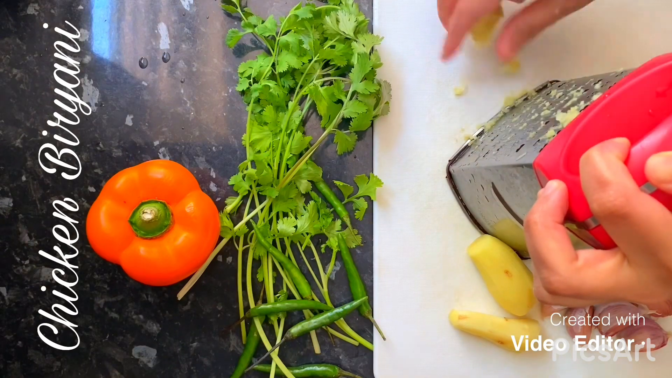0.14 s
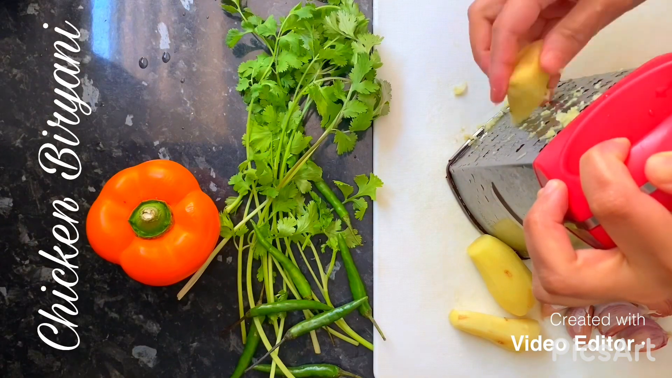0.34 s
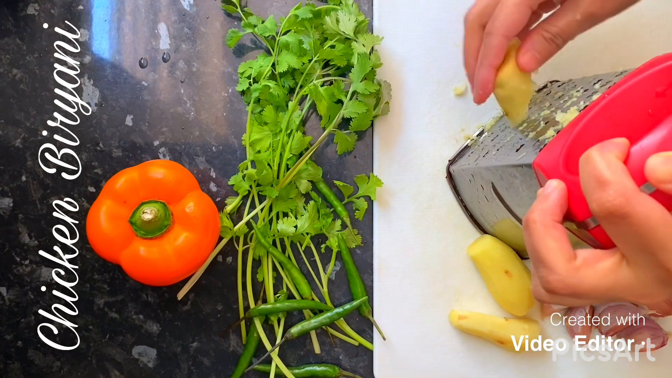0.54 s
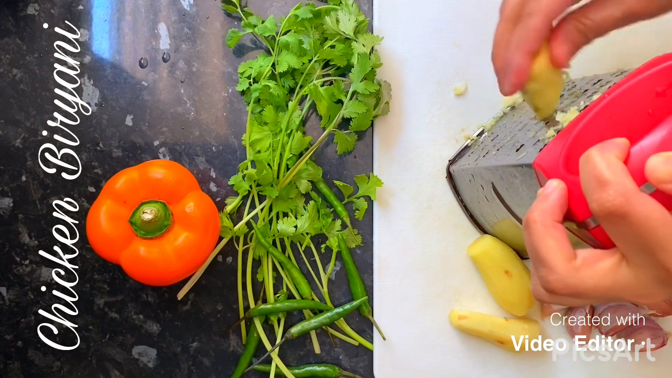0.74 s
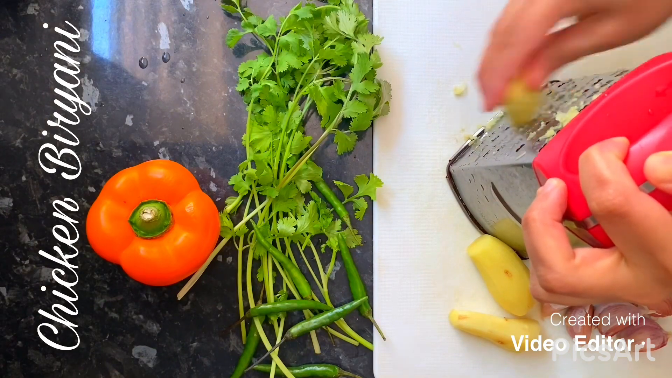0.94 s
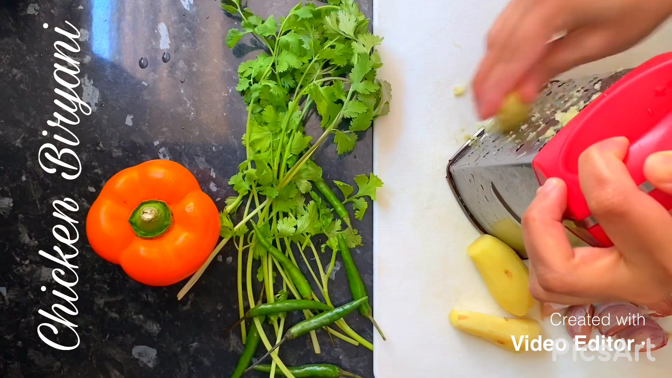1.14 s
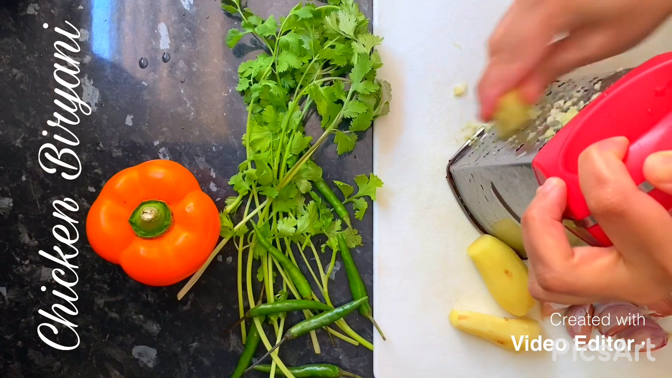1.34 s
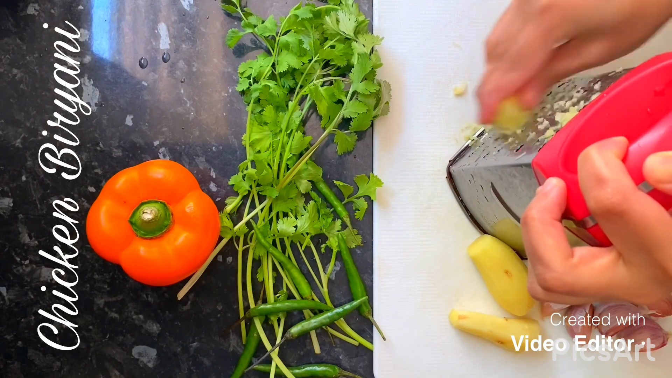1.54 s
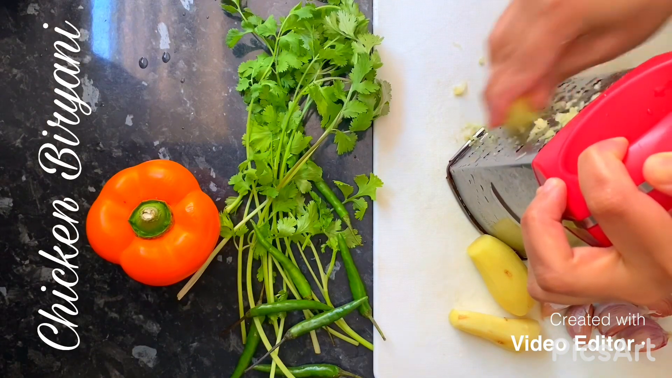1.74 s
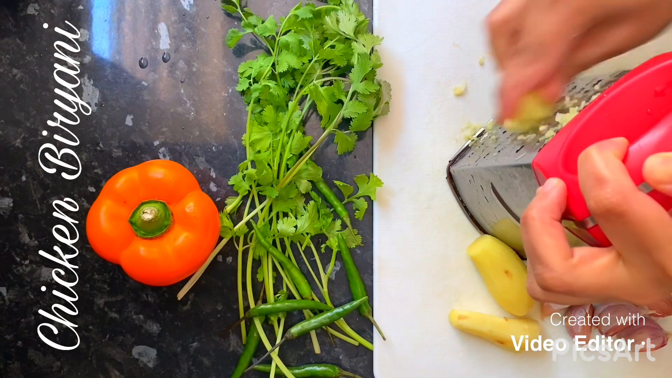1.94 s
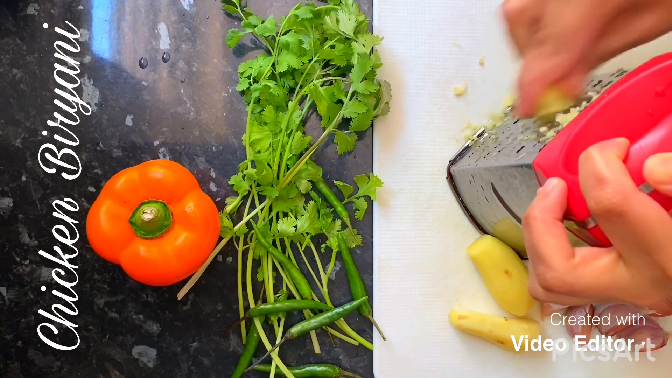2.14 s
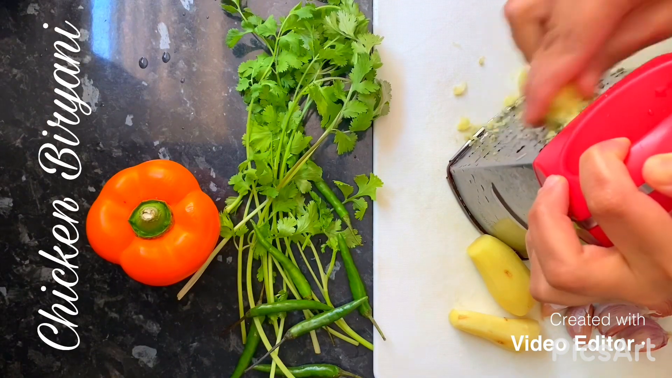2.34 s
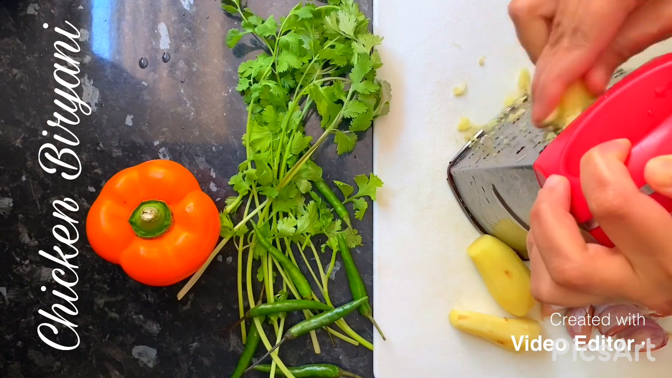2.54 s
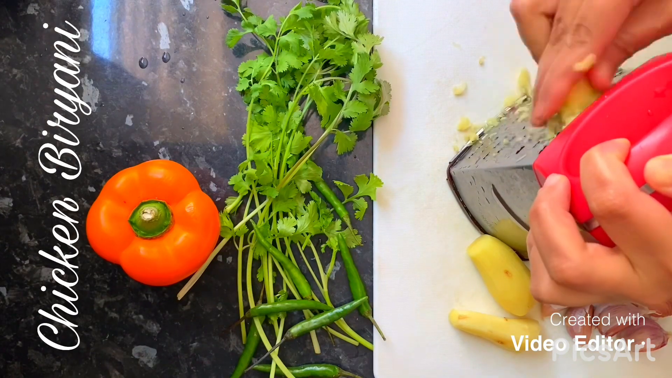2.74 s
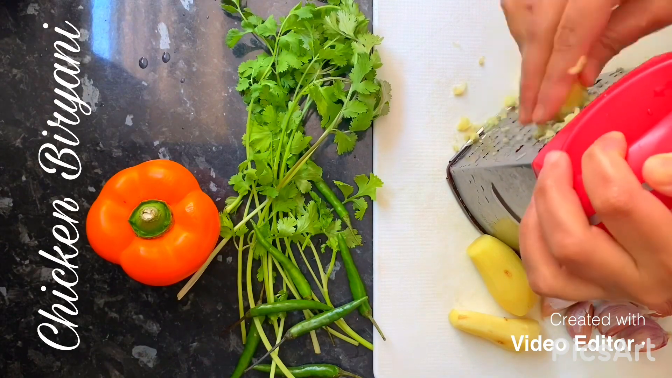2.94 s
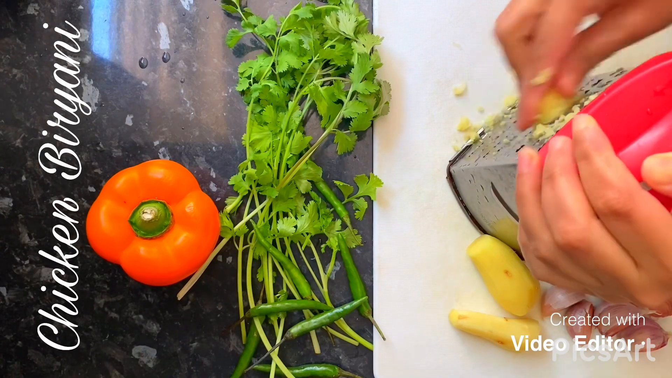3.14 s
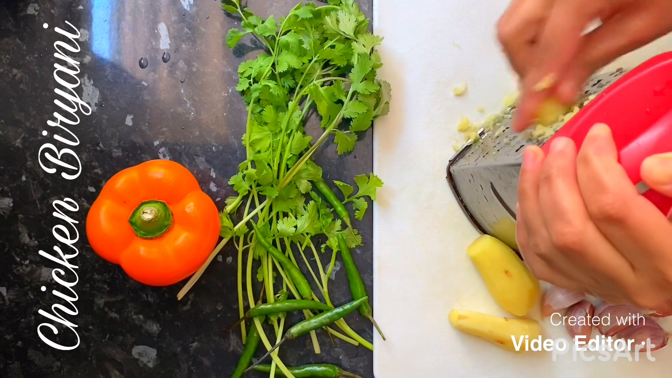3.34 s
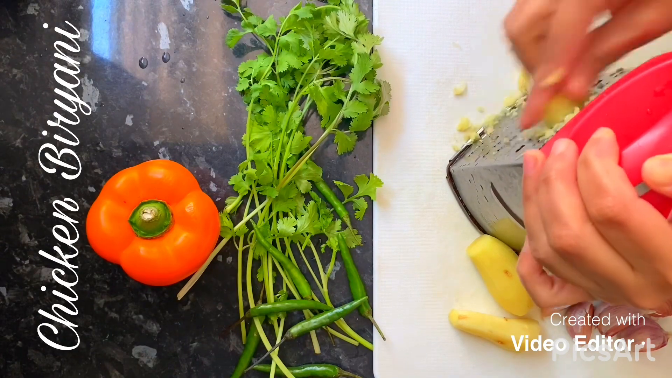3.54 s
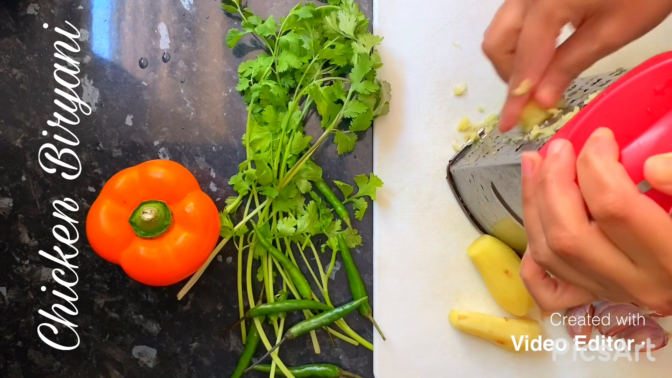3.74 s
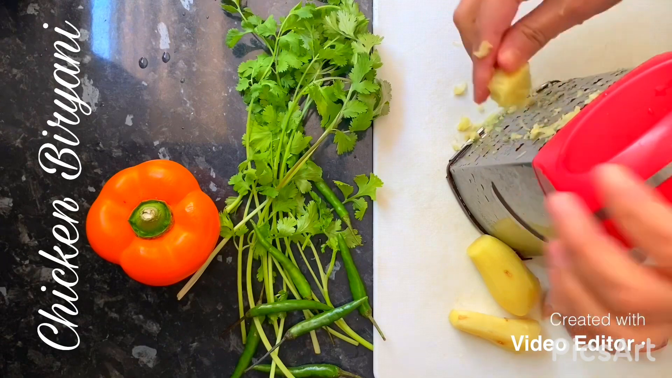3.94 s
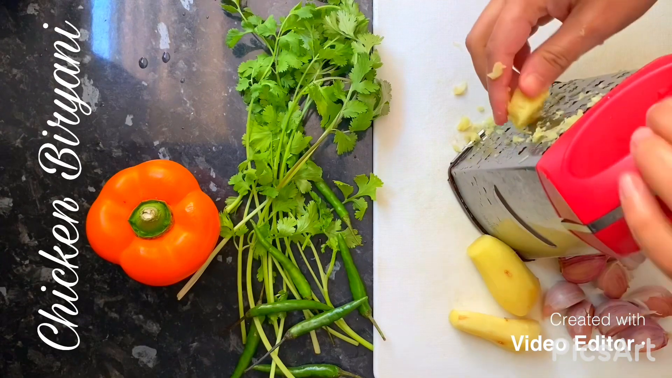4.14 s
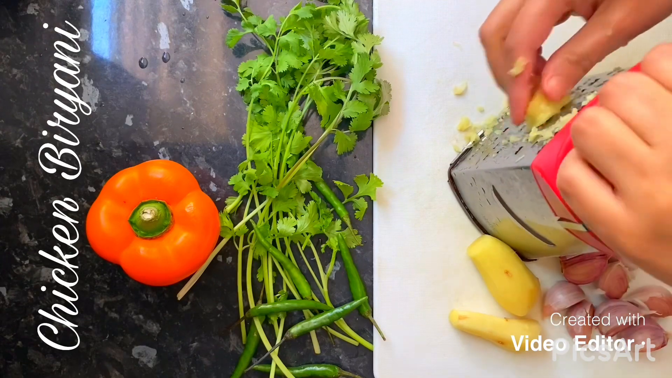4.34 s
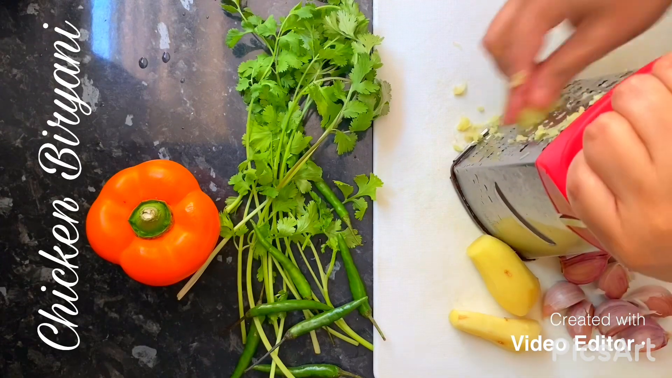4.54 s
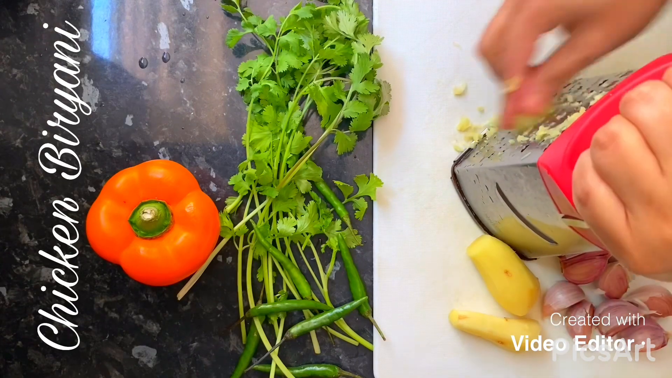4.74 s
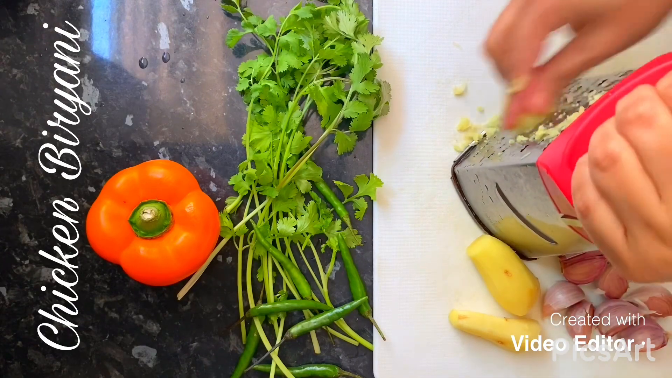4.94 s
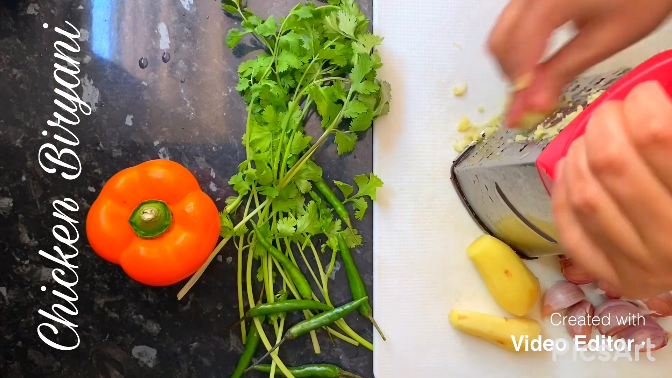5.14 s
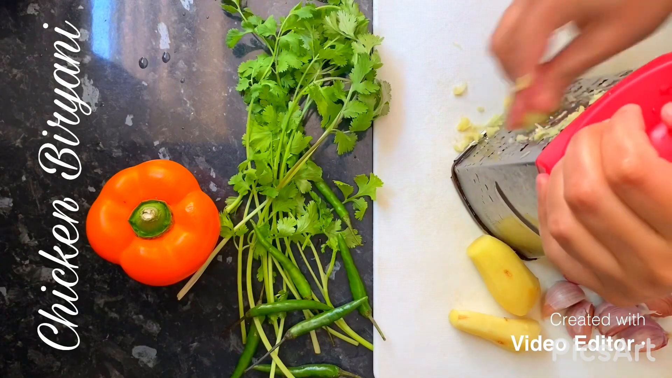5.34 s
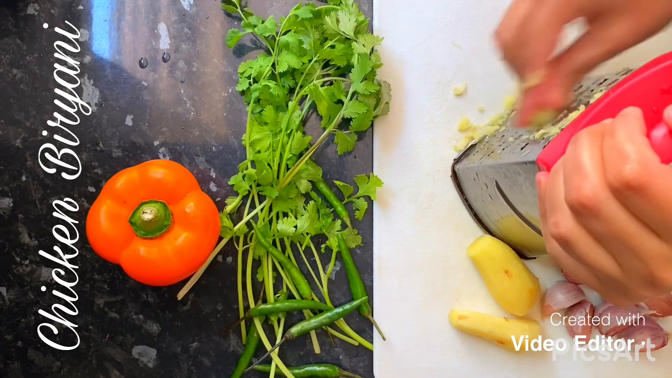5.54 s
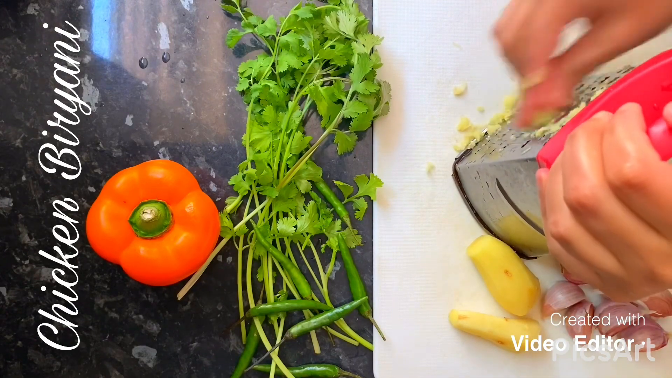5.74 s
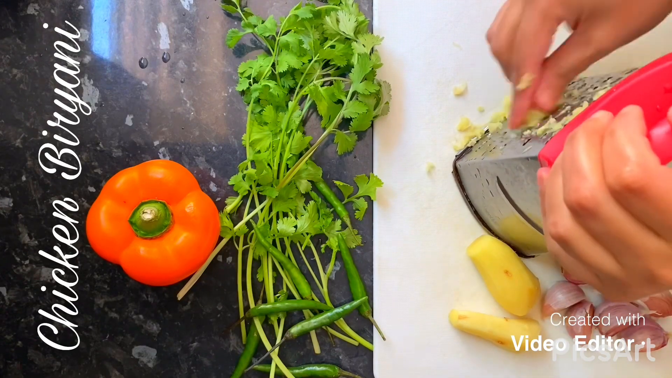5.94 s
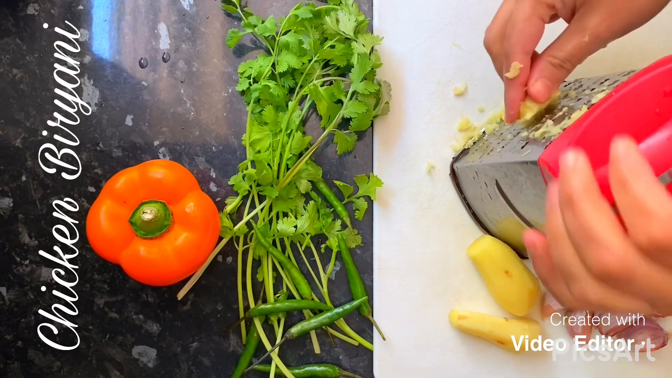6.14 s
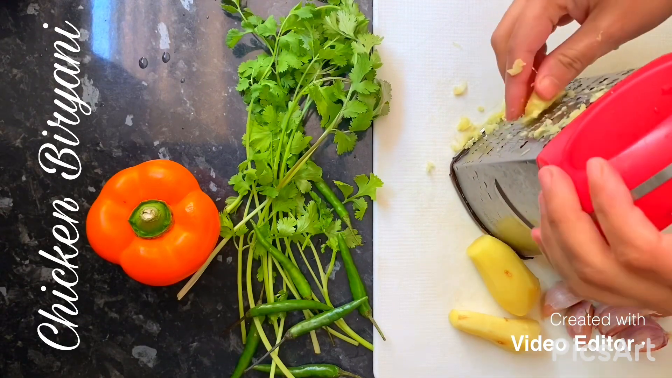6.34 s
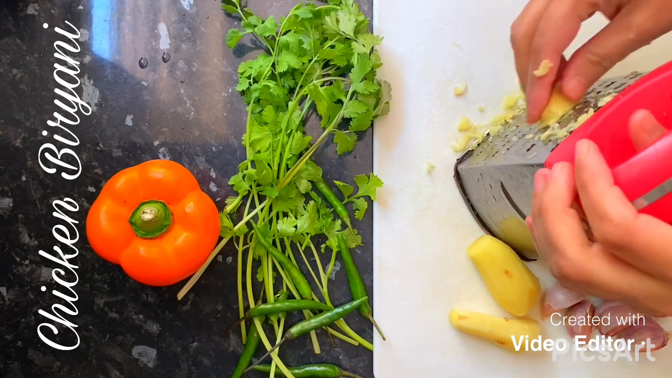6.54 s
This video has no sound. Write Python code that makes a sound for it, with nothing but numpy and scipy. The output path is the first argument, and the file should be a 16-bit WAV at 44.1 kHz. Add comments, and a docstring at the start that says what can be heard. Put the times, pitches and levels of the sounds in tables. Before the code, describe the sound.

Fresh ginger rasps quickly back and forth on a hollow steel grater, wet and crackling, with a short pause midway and a soft tap near the end.

```python
"""Ginger is rubbed on a steel box grater on a cutting board, in a small kitchen with a faint, steady hush.
The rim knocks on the board and light touches brush the steel; then strokes to and fro run ten a second,
rest briefly at 3.7 s and go on in a new hold. Teeth tear fibres in a dense crackle that rings the box,
juice crackles in the treble, tough fibres snap and the rocking grater makes the worktop rumble.
Touches and a soft ringing tap on the rim end it; a phone close above hears all with two microphone ports."""
import sys
import numpy as np
from scipy import signal
from scipy.fft import rfft, irfft, next_fast_len
from scipy.io import wavfile
from scipy.ndimage import uniform_filter1d

SR = 44100
rng = np.random.default_rng(int(sys.argv[2]) if len(sys.argv) > 2 else 0)


def materialize(psi):
    """Save the field psi as 16-bit PCM at rate SR to the path in sys.argv[1].

    A 1-D psi becomes a single channel; in a 2-D psi each row is a channel.
    """
    bounded = np.clip(np.atleast_2d(psi).T, -1, 1)
    quanta = np.round(bounded * 32767).astype(np.int16)
    wavfile.write(sys.argv[1], SR, quanta)


N = 290619
T = np.arange(N) / SR
SIZE = next_fast_len(N + SR)
HZ = np.fft.rfftfreq(SIZE, 1 / SR)

# strokes to and fro across the teeth; levels are relative, before grip and filters:
# start_s, rasp_db, juice_db, peak_place (fastest moment as a share of the stroke, held to .38-.62),
# low_lift_db (box's low modes), shake_db (worktop)
STROKES = [(0.713, -44.5, -53, 0.44, 3.5, -44.5), (0.84, -46, -53.5, 0.48, 2, -44.5),
           (0.957, -43, -51, 0.37, 3.5, -40.5), (1.061, -40.5, -48.5, 0.33, 3.5, -41),
           (1.165, -40.5, -49, 0.14, 5.5, -38), (1.268, -40, -48, 0.7, -2.5, -43),
           (1.36, -38, -47.5, 0.1, 2.5, -35), (1.459, -38, -47.5, 0.4, 1.5, -43),
           (1.554, -40.5, -47.5, 0.4, -3.5, -35), (1.648, -40, -47.5, 0.41, 1.5, -40),
           (1.749, -37.5, -45, .46, 1.5, -40), (1.845, -39, -44.5, 0.5, 3.5, -42),
           (1.942, -38, -45.5, 0.42, 4, -38), (2.037, -39.5, -46.5, 0.4, -1.5, -34.5),
           (2.13, -38, -46, 0.37, 0.5, -39), (2.222, -37.5, -44, 0.44, 2, -35.5),
           (2.311, -36.5, -45, 0.47, 3, -33.5), (2.405, -37.5, -44.5, 0.43, 0, -33),
           (2.504, -37.5, -45, 0.53, -1.5, -32.5), (2.6, -37.5, -44.5, 0.49, 3, -36),
           (2.701, -37, -45.5, 0.45, 3, -35), (2.799, -41, -48.5, 0.3, 0.5, -36),
           (2.905, -40, -48.5, .45, 4, -36.5), (3.005, -40.5, -48, .52, 1.5, -44),
           (3.118, -38.5, -45, 0.42, 3.5, -39), (3.221, -41.5, -48, 0.42, -3, -35),
           (3.32, -37.5, -46, 0.48, 1, -38.5), (3.412, -36.5, -45, 0.55, 0, -30.5),
           (3.515, -37, -45, 0.45, -0.5, -33), (3.621, -39.5, -49, 0.22, -1, -38.5),
           (4.34, -39.5, -50.5, 0.5, 3, -34), (4.448, -37.5, -46, 0.25, 0, -37),
           (4.552, -38, -47.5, 0.55, -0.5, -36), (4.647, -37, -46, .5, -2.5, -28.5),
           (4.747, -35.5, -47, 0.49, 1, -32.5), (4.848, -37.5, -46.5, 0.51, -2.5, -34),
           (4.948, -38, -45.5, 0.46, 0, -32), (5.05, -38, -46.5, 0.36, 0.5, -34.5),
           (5.154, -34.5, -44, .54, -1, -34), (5.248, -36, -46, 0.6, 0.5, -35.5),
           (5.348, -37.5, -45.5, 0.34, 0, -33.5), (5.442, -37.5, -46, 0.48, 3.5, -32),
           (5.537, -37, -44.5, 0.39, 2, -35), (5.639, -37, -46, 0.37, 1, -29),
           (5.74, -36.5, -45, 0.3, -2.5, -33.5), (5.839, -43, -53, 0.3, -7, -39)]
# tough fibres that snag on a tooth and snap: start_s, level_db (relative), crunch_hz (centre)
SNAGS = [(0.589, -33.5, 1940), (0.617, -26.5, 2430), (0.718, -28, 1940), (0.854, -25.5, 1420),
         (0.886, -23.5, 1620), (0.976, -28, 2220), (1.096, -28, 1230), (1.191, -18.5, 2430),
         (1.377, -25, 902), (1.492, -31, 1570), (1.515, -17, 1260), (1.681, -22, 1630),
         (1.772, -14.5, 1930), (1.787, -15.5, 663), (1.892, -25, 1970), (1.954, -25, 1390),
         (2.083, -23, 1940), (2.154, -20.5, 1240), (2.239, -23, 1570), (2.262, -16.5, 1850),
         (2.331, -21.5, 1340), (2.452, -18, 1580), (2.524, -19.5, 1340), (2.647, -15, 2090),
         (2.665, -17.5, 1570), (2.722, -23, 1210), (2.825, -21, 1570), (2.928, -18.5, 1250),
         (3.144, -21.5, 1580), (3.339, -20, 2060), (3.445, -28, 1280), (3.658, -22, 1280),
         (4.389, -15.5, 1620), (4.482, -14, 2340), (4.508, -20, 1540), (4.686, -13.5, 2600),
         (5.076, -16.5, 1260), (5.18, -22, 1330), (5.208, -18.5, 1600), (5.281, -22, 1560),
         (5.327, -23, 1570), (5.37, -28, 2470), (5.47, -15, 1340), (5.561, -20.5, 1550), (5.67, -21, 2440),
         (5.773, -21, 1580)]
# the grater tips and bumps the board: start_s, thud_db, shake_db (shaking that follows), both relative
BUMPS = [(1.445, -14.5, -24), (1.811, -48, -27.5), (2.192, -38, -35), (2.745, -40, -36),
         (2.994, -19.5, -26.5), (3.603, -38, -25), (4.25, -38, -43), (4.431, -21, -26.5), (5.249, -49, -32),
         (5.69, -44, -46), (6.191, -39, -41), (6.43, -70, -43)]


def undb(db):
    """Decibels to gain."""
    return 10 ** (np.asarray(db) / 20)


def unit(response):
    """Scale a frequency response so white noise keeps its power."""
    return response / np.sqrt(np.mean(np.abs(response) ** 2))


def through(x, response):
    """Filter by a frequency response."""
    return irfft(rfft(x, SIZE) * response, SIZE)[..., :N]


def colour(points):
    """Causal response with the given (Hz, dB) outline, scaled so white noise keeps its power."""
    hz, db = np.transpose(points)
    outline_db = np.interp(np.log(HZ + 1), np.log(hz), db)
    # folding the cepstrum forward in time gives minimum phase
    cepstrum = irfft(np.log(undb(outline_db)), SIZE)
    cepstrum[1:SIZE // 2] *= 2
    cepstrum[SIZE // 2 + 1:] = 0
    return unit(np.exp(rfft(cepstrum)))


def mode(hz, width, freqs=HZ):
    """Response of one resonance, gain 1 at its centre."""
    return 1j * freqs * width / (hz ** 2 - freqs ** 2 + 1j * freqs * width)


def walk(rate):
    """Chance level joined by straight lines between `rate` random points a second, spread a little under 1."""
    return np.interp(T * rate, np.arange(N), rng.standard_normal(N))


def crackle(rate, spread_db):
    """Lone clicks of uneven size and either sign, about `rate` a second, scaled to rms 1."""
    size_chance, time_chance, sign_chance = rng.random((3, N))
    size = undb(spread_db * np.minimum(-np.log(1 - size_chance), 4))
    clicks = (time_chance < rate / SR) * size * np.sign(sign_chance - .5)
    return clicks / clicks.std()


def fade(start, fade_s, rise_s):
    """A quick rise that dies away."""
    live = slice(int(start * SR), int((start + 10 * fade_s) * SR))
    age = np.maximum(T[live] - start, 0)
    shape = np.zeros(N)
    shape[live] = (1 - np.exp(-age / rise_s)) * np.exp(-age / fade_s)
    return shape


def steady(x):
    """Even out the swell of a ringing, as the hand's constant drive does; rms near 1."""
    return x / np.sqrt(uniform_filter1d(x ** 2, size=2000) + 1e-9)


def hush():
    """Faint steady air of the kitchen, alike at both ports in the bass, with a narrow noise band near 3.3 kHz."""
    # spectrum of the room air: freq_hz, level_db (per Hz)
    air_outline = [(20, 0), (36, -5), (55, -7.5), (105, 0), (170, -6), (250, -13), (550, -15.5),
                   (950, -20.5), (1100, -26), (2700, -35.5), (3250, -38), (3650, -44.5), (6500, -69),
                   (10000, -42), (16000, -67)]
    mid, side = through(rng.standard_normal((2, N)), colour(air_outline))
    difference = through(side, HZ / (HZ + 900))
    air = mid + np.array([[1], [-1]]) * difference
    narrow_band = through(rng.standard_normal((2, N)), unit(mode(3320, 130) ** 2))
    return undb(-57.5) * air + undb(-85) * narrow_band


def strokes():
    """Rows of the stroke table with their length added: each lasts to the next turn, or until the hand stops."""
    usual_s = .1
    gaps = np.diff([row[0] for row in STROKES], append=np.inf)
    return np.column_stack([STROKES, np.where(gaps < 2 * usual_s, gaps, usual_s)])


def shaking():
    """Strength of the worktop's shaking: strokes drive it, it runs on a little and swells after each bump."""
    build_s, run_on_s, resting_db = .06, .14, -62  # it never quite ends
    drive = np.zeros(N)
    for start, *others, shake_db, length in strokes():
        drive += undb(shake_db) * ((T >= start) & (T < start + length))
    build = uniform_filter1d(drive, int(build_s * SR))
    keep = np.exp(-1 / (run_on_s * SR))
    run_on = signal.lfilter([1 - keep], [1, -keep], drive)
    swells = sum(undb(shake_db) * fade(start, fade_s=.045, rise_s=.006) for start, thud_db, shake_db in BUMPS)
    return undb(resting_db) + undb(-2) * build + undb(-12) * run_on + swells


def thuds():
    """Each bump of the grater is a short burst of noise, strongest in the bass."""
    blows = sum(undb(thud_db) * fade(start, fade_s=.0071, rise_s=.01) for start, thud_db, shake_db in BUMPS)
    board = colour([(30, -8), (65, 18.5), (100, 14), (150, 6.5), (260, 7), (400, -45), (1200, -44), (8000, -78)])
    return through(blows * rng.standard_normal(N), board)


def worktop(rocking):
    """The rocking grater keeps the worktop's modes shaking and now and then bumps it."""
    # modes of board and worktop: centre_hz, width_hz, level_db (relative)
    wood_modes = [(53.1, 26, -5.5), (73.7, 25, -2.5), (95.8, 2.4, -0.5), (146, 18, -7), (187.1, 26.3, -5),
                  (230.2, 10, -8.5), (257.7, 1.9, -15.5)]
    outline = colour([(25, -23.5), (45, 6.5), (280, -9.5), (400, -14), (900, -10)])
    body = unit(sum(undb(db) * mode(hz, width) for hz, width, db in wood_modes) * outline)
    rumble = steady(through(rng.standard_normal(N), body))
    shake = (undb(-5.5) * rocking + undb(-4) * rumble) * shaking()
    return shake + undb(3) * thuds()


def handling():
    """Fingers shift on the root and the handle: a faint, patchy rustle."""
    patchy = undb(4 * np.minimum(walk(14), 1.5))
    return undb(-78) * patchy * crackle(rate=500, spread_db=3)


def box(push, size=16384):
    """The steel rings; each stroke loads it at a new place, which detunes the modes and shifts their balance."""
    # modes of the steel box, levels relative:
    # centre_hz, width_hz, first_hold_db, second_hold_db, left_minus_right_db
    steel_modes = [(433, 21.5, -2, -1.5, -4), (608.3, 19, 3.5, 3, -3), (652.6, 26, -3, 2, 13),
                   (726, 118, -2.5, 0.5, -6), (881, 83, -5.5, -11.5, 3.5), (1017, 23, -13, -9.5, 14.5),
                   (1250, 60, -2, -1, 9.5), (1327, 92, -2, -1, -9), (1565, 34.4, 3.5, 4, 10),
                   (1727, 150, -9, -11.5, -13.5), (1950, 360, -14, -14.5, -14), (1972, 105, 1.5, -2.5, 5),
                   (2284, 164, -9, -7, -5), (2417, 88, -4.5, 0, -0.5), (2736, 58, -12, -12.5, 19.5),
                   (2978, 183, -10, -10.5, -10), (3115, 78, -7, -9, 8), (3725, 65, -4, -5.5, -1),
                   (4300, 58, -13, -10, 13.5)]
    # share of a stroke's low lift that a mode gets: freq_hz, share (0-1)
    low_share = [(900, 1), (1200, 0)]
    regrip_s = 4.0  # the hand on the grater moves to its second hold
    detune_share, scatter_db = .02, 2.8  # typical straying of each mode
    freqs = np.fft.rfftfreq(size, 1 / SR)
    hz, width, first_db, second_db, pan = np.transpose(steel_modes)
    outline = colour([(200, -2.5), (350, -8.5), (450, 0), (4500, -1), (9000, -14.5)])
    radiation = np.interp(freqs, HZ, outline)
    turns = [int(row[0] * SR) for row in STROKES] + [N]
    # the loading changes at each turn, and every half block while the hand rests
    cuts = {N}
    for a, b in zip([0] + turns, turns):
        cuts.update(range(a, b, size // 2))
    cuts = sorted(cuts)
    out = np.zeros((2, N + size))
    for a, b in zip(cuts, cuts[1:]):
        detune, favour = rng.standard_normal((2, len(steel_modes)))
        hold_db = first_db if a < regrip_s * SR else second_db
        lift_db = np.interp(a, turns[:-1], [row[4] for row in STROKES])
        db = hold_db + scatter_db * favour + lift_db * np.interp(hz, *np.transpose(low_share))
        shapes = mode(hz[:, None] * (1 + detune_share * detune[:, None]), width[:, None], freqs)
        response = unit(undb(db + np.array([pan, -pan]) / 2) @ shapes * radiation)
        out[:, a:a + size] += irfft(rfft(push[a:b], size) * response, size)
    return out[:, :N]


def rim_knocks():
    """The rim of the grater knocks on the board: short noise bursts in a broad band."""
    # start_s, fade_s, level_db (relative), centre_hz
    knock_table = [(0.049, 0.013, -47, 517), (0.075, 0.011, -50, 503)]
    out = np.zeros(N)
    for start, fade_s, db, hz in knock_table:
        burst = undb(db) * fade(start, fade_s, rise_s=.00064) * rng.standard_normal(N)
        out += through(burst, unit(mode(hz, .57 * hz) ** 2))
    return out


def arch(start, length, peak, power):
    """Speed of the root in one stroke, scaled to rms 1: fastest at its peak, it nearly stops at each turn."""
    turn_speed = .24  # added to a swing from 0 to 1
    peak = np.clip(peak, .38, .62)
    u = np.interp(np.linspace(0, 1, int(length * SR)), [0, peak, 1], [0, .5, 1])
    speed = turn_speed + np.abs(np.sin(np.pi * u)) ** power
    return np.pad(speed / np.sqrt(np.mean(speed ** 2)), (int(start * SR), N))[:N]


def contact(rocking):
    """How hard fibres are torn and juice is pressed out at each moment."""
    # light touches of root and fingers on the steel, levels relative: start_s, rise_s, fade_s, rasp_db, juice_db
    touch_table = [(.26, .003, 0.024, -54, -61), (0.28, 0.0033, 0.01, -55, -70),
                   (0.587, 0.0035, 0.019, -46, -51.5), (0.61, 0.006, 0.035, -47.5, -51),
                   (0.664, 0.0095, 0.014, -46, -48), (3.725, 0.0015, 0.052, -53.5, -60),
                   (3.972, .003, 0.013, -59, -72), (4.235, .06, 0.056, -59, -68),
                   (4.322, 0.033, .03, -49, -75), (5.937, 0.0018, 0.048, -53.5, -61),
                   (5.987, 0.0024, 0.03, -57.5, -80), (6.146, 0.011, .02, -55, -70),
                   (6.173, 0.0016, 0.018, -42.5, -57.5), (6.425, 0.05, 0.052, -52, -75),
                   (6.455, 0.032, 0.042, -62, -62), (6.534, .008, 0.014, -50, -67),
                   (6.578, .01, 0.022, -49, -51)]
    tear, wet = np.zeros((2, N))
    for start, rasp_db, juice_db, peak, low_db, shake_db, length in strokes():
        tear += undb(rasp_db) * arch(start, length, peak, power=1.3)
        wet += undb(juice_db) * arch(start, length, peak, power=1.18)
    # the soft root gives, which rounds each turn
    tear, wet = uniform_filter1d(np.array([tear, wet]), size=400)
    # it catches and slips along the rows of teeth, and bites deeper as the grater rocks towards it
    grip_db = 1.4 * walk(210) + .6 * rocking
    for start, level_db, hz in SNAGS:
        # it hangs for 10 ms before a tough fibre gives way, so the rasp dips 5 dB
        grip_db = grip_db - 5 * ((T > start - .01) & (T < start))
    tear = tear * undb(grip_db + .31)
    wet = wet * undb(.5 * grip_db + 2 * walk(120) + .5)
    patchy = undb(2.5 * walk(150))
    for start, rise_s, fade_s, rasp_db, juice_db in touch_table:
        touch = fade(start, fade_s, rise_s) * patchy
        tear = tear + undb(rasp_db) * touch
        wet = wet + undb(juice_db) * touch
    return tear, wet


def snapping():
    """Each tough fibre breaks in a short burst of cracks with a pitch of its own."""
    fade_s, rise_s = .006, .0006
    out = np.zeros(N + SR)
    age = np.arange(int(10 * fade_s * SR)) / SR
    shape = (1 - np.exp(-age / rise_s)) * np.exp(-age / fade_s)
    for start, db, hz in SNAGS:
        cracks = undb(db) * shape * rng.standard_normal(len(age))
        crunch = signal.lfilter(*signal.iirpeak(hz, 2.5, fs=SR), cracks)
        out[int(start * SR):][:len(age)] += undb(-6) * cracks + undb(3.5) * crunch
    return out[:N]


def grater(tear, wet):
    """Breaking fibres ring the box and are heard directly; bursting cells crackle in the treble."""
    # spectra of torn fibre and of spurting juice: freq_hz, level_db (per Hz)
    fibre_outline = [(100, -27.5), (300, -3), (700, -4), (2500, -19), (4000, -6.5), (6000, -14.5),
                     (16000, -17.5)]
    juice_outline = [(500, -30), (2500, -10), (4000, -4), (5300, -3), (7800, 1.5), (11000, -2), (15000, 0)]
    snaps = snapping()
    breaks = tear * crackle(rate=1200, spread_db=1.5) + undb(-11) * snaps + handling()
    cells = wet * crackle(rate=6000, spread_db=1) + undb(-17.5) * snaps
    steel = undb(-2.5) * box(breaks)
    torn = undb(-13.5) * through(breaks, colour(fibre_outline))
    juice = undb(1.5) * through(cells, colour(juice_outline))
    return steel + torn + rim_knocks() + juice


def rim():
    """A soft tap on the free rim and its bounce leave a few thin, short rings."""
    # modes of the free rim: centre_hz, width_hz, level_db (relative)
    rim_modes = [(1370, 63, -3), (1420, 60, -7), (1780, 58, 0), (1920, 37, 5), (2681, 30, 6.5),
                 (2820, 110, -18), (3310, 12, -13), (3940, 30, -14), (4920, 16, -5), (5600, 13, -17)]
    # the tap and its bounce: start_s, level_db (relative)
    tap_table = [(6.1704, -9), (6.1762, -17)]
    contact_s = .00017  # time scale of the bell-shaped press
    push = sum(undb(db) * np.exp(-((T - start) / contact_s) ** 2) for start, db in tap_table)
    push = push / (np.sqrt(np.pi) * contact_s * SR)
    return through(push, unit(sum(undb(db) * mode(hz, width) for hz, width, db in rim_modes)))


def reflections(x, t60_s, treble_t60_s, delay_s):
    """A dense echo tail, different at each port, whose treble dies first."""
    tails = rng.standard_normal((2, N))
    low = through(tails, 1 / (1 + (HZ / 3500) ** 2))
    low_tail = low * undb(-60 * T / t60_s)
    treble_tail = (tails - low) * undb(-60 * T / treble_t60_s)
    tail = (low_tail + treble_tail) * (T > delay_s)
    tail = tail / np.sqrt(np.sum(tail ** 2, axis=1, keepdims=True))
    return through(x, rfft(tail, SIZE))


def scene():
    """Grater at close range, its echoes from the worktop and the walls, rumble and room air."""
    # phase by which the right microphone port lags: freq_hz, lag_rad
    port_lag = [(0, 0), (2000, 0), (2600, 1.3), (3500, 1.2), (5200, .2), (7200, 3.1), (10300, 6.3),
                (13600, 9.4), (16000, 12.5)]
    # the grater's slow rocking on the board: a narrow band around 46 Hz
    rocking = steady(through(rng.standard_normal(N), unit(mode(hz=46, width=4.5) ** 2)))
    rasp = grater(*contact(rocking)) + rim()
    lag = np.interp(HZ, *np.transpose(port_lag))
    direct = through(rasp, np.exp(-1j * np.outer([0, 1], lag)))
    near = undb(-9) * reflections(rasp, t60_s=.05, treble_t60_s=.04, delay_s=.001)
    walls = undb(-13) * reflections(rasp, t60_s=.42, treble_t60_s=.38, delay_s=.007)
    return undb(2) * direct + near + walls + worktop(rocking) + hush()


def record(dry):
    """The phone cuts the deepest bass and the top of the treble."""
    low_cut = signal.butter(N=8, Wn=36, btype="high", fs=SR, output="sos")
    top_cut = signal.ellip(10, .2, 80, 15800, fs=SR, output="sos")
    return signal.sosfilt(top_cut, signal.sosfilt(low_cut, dry))


dry = scene()
out = record(dry)
materialize(out)
```